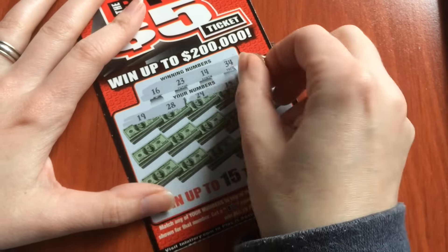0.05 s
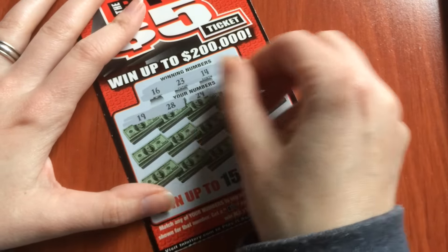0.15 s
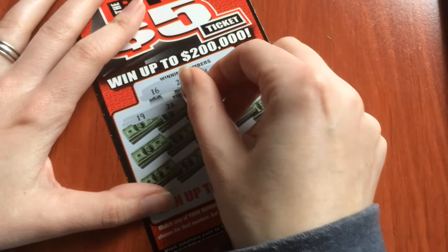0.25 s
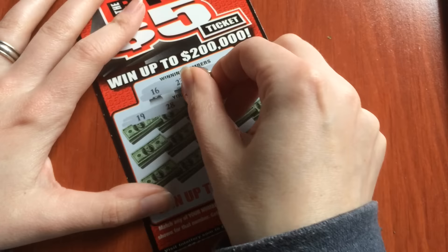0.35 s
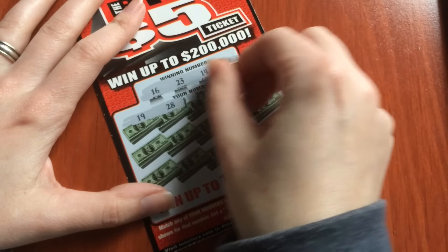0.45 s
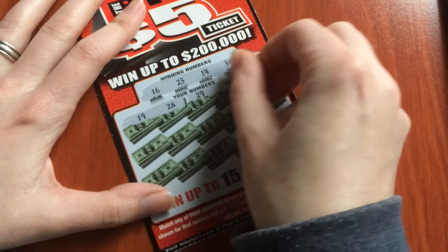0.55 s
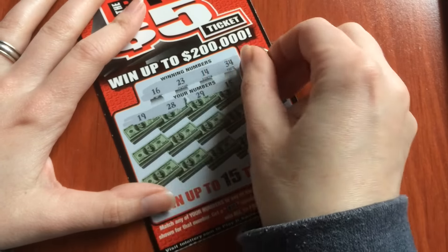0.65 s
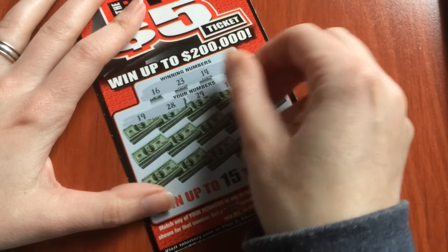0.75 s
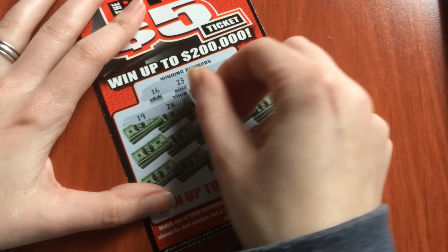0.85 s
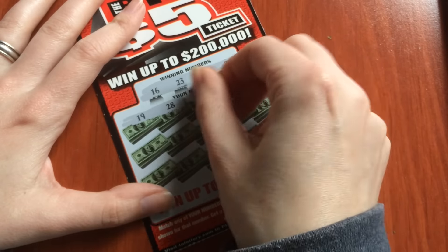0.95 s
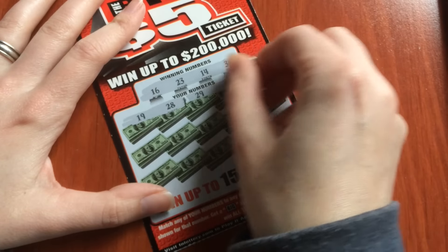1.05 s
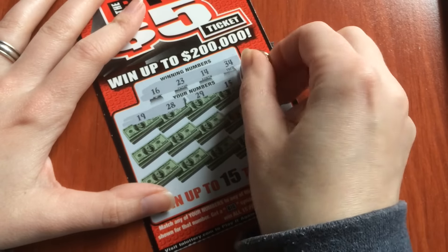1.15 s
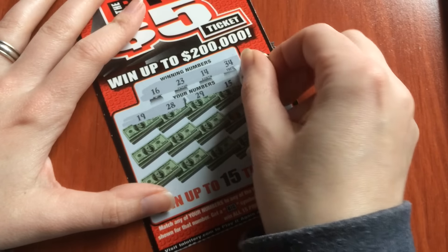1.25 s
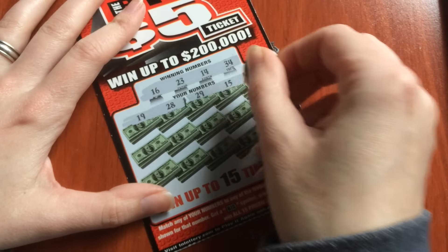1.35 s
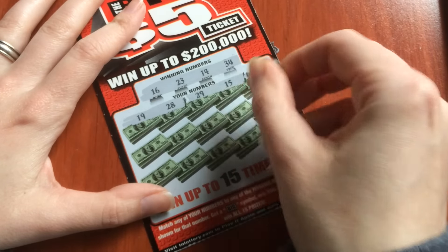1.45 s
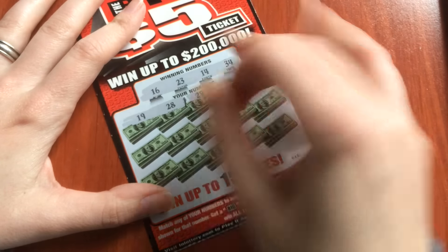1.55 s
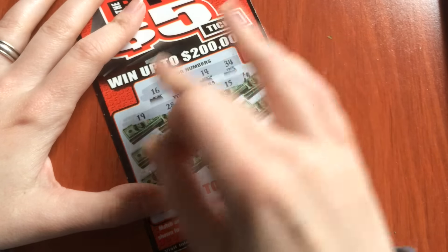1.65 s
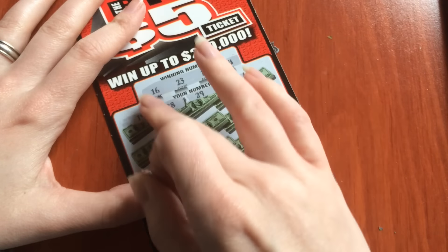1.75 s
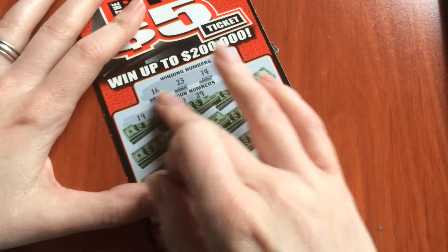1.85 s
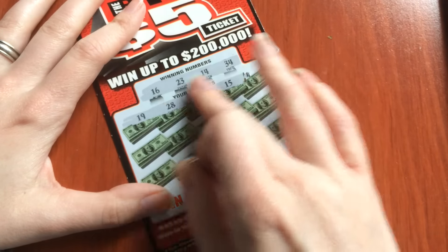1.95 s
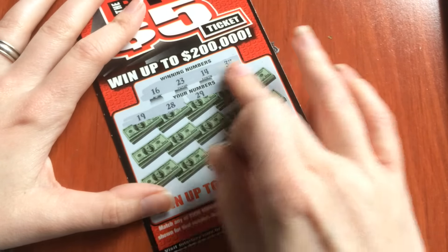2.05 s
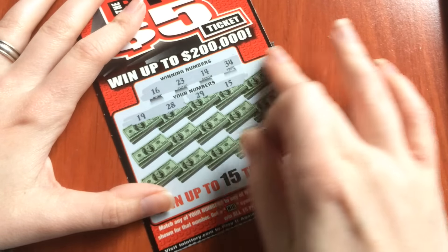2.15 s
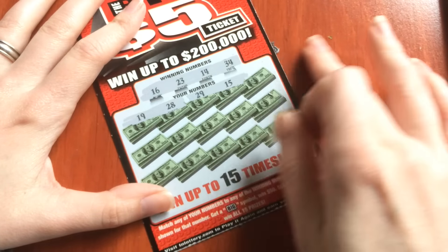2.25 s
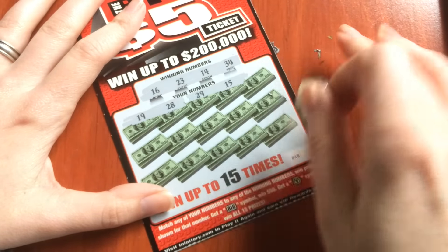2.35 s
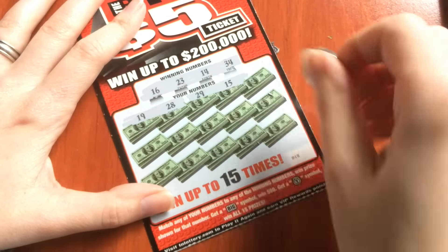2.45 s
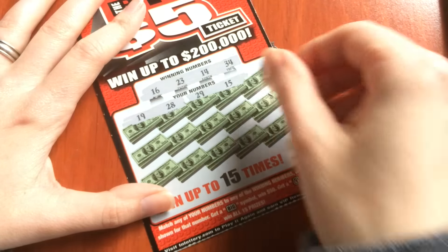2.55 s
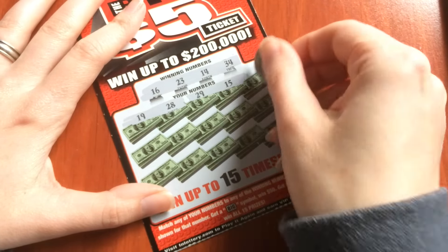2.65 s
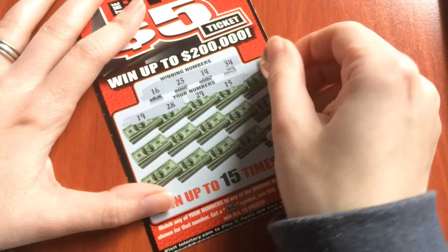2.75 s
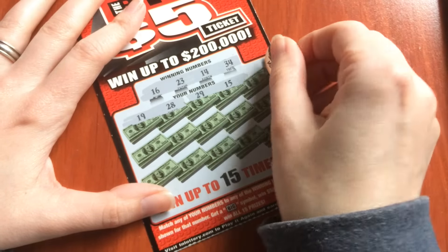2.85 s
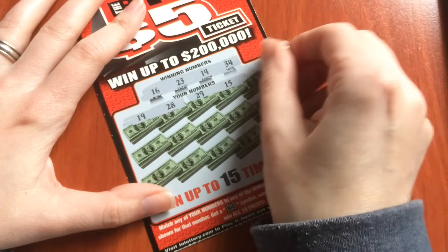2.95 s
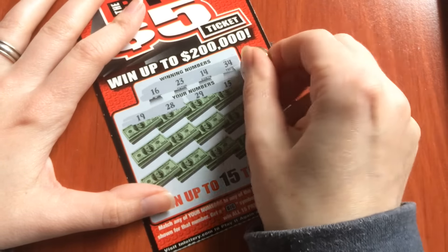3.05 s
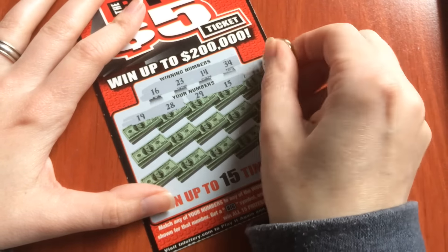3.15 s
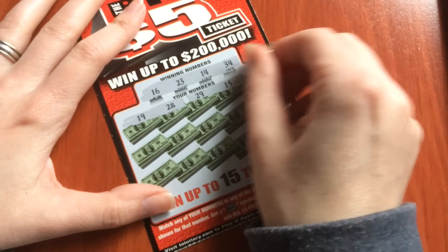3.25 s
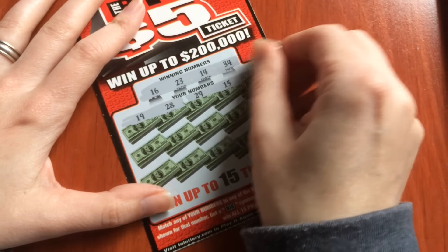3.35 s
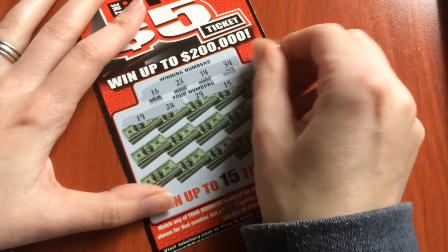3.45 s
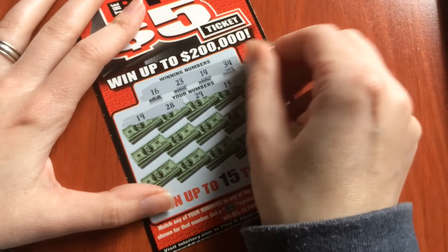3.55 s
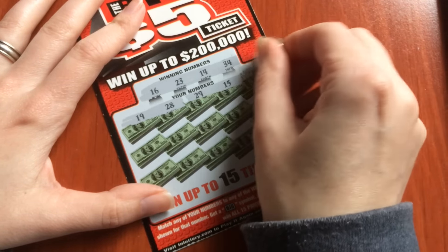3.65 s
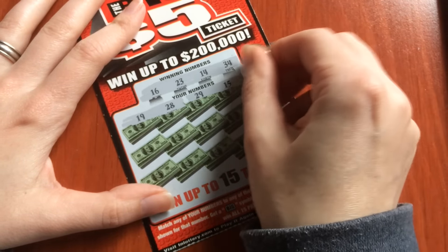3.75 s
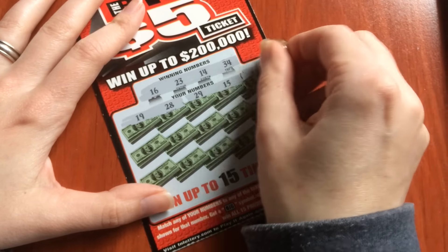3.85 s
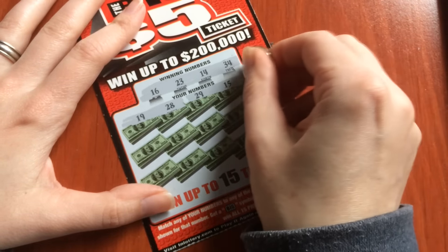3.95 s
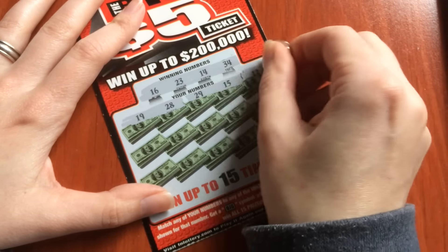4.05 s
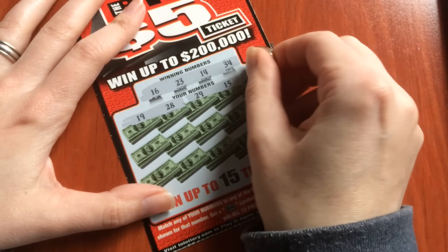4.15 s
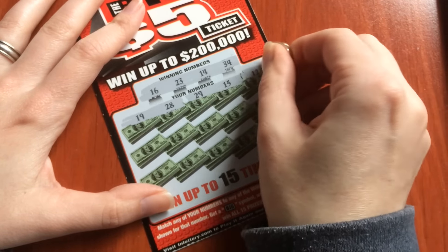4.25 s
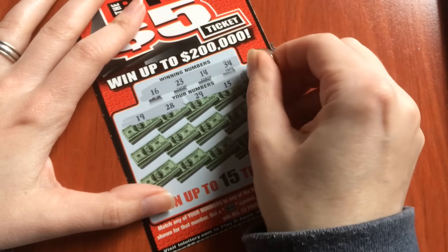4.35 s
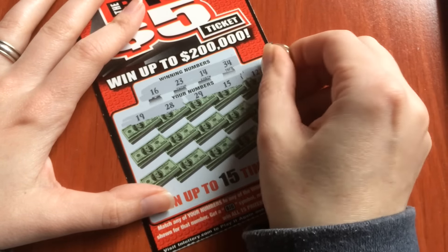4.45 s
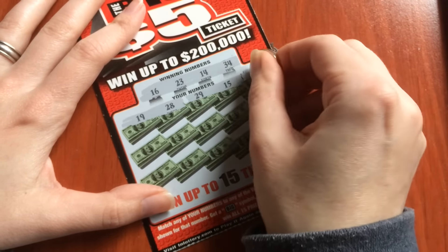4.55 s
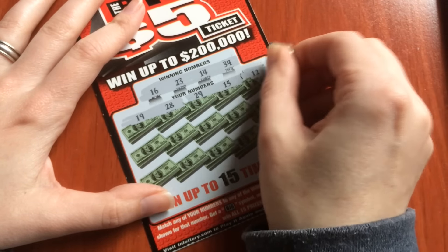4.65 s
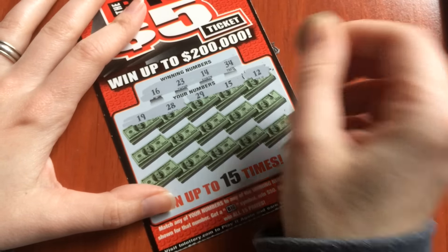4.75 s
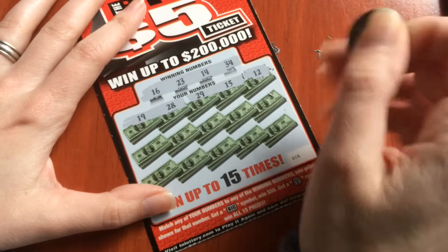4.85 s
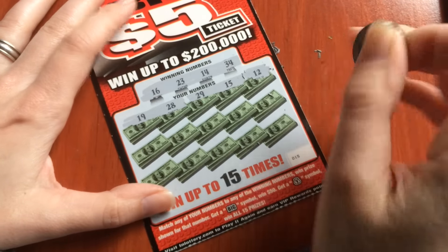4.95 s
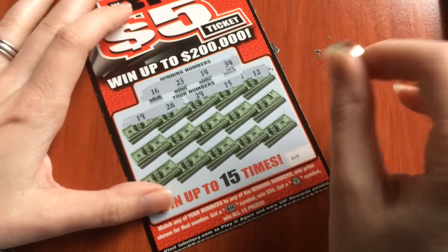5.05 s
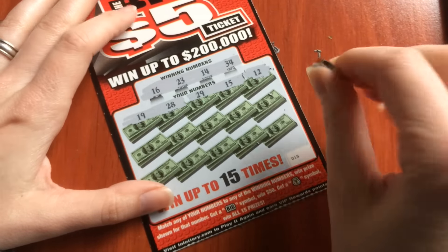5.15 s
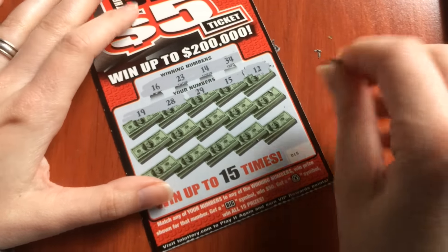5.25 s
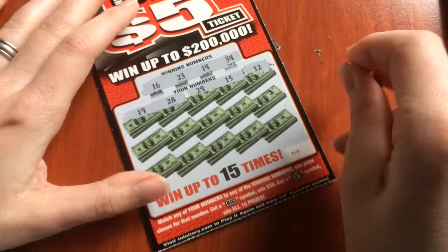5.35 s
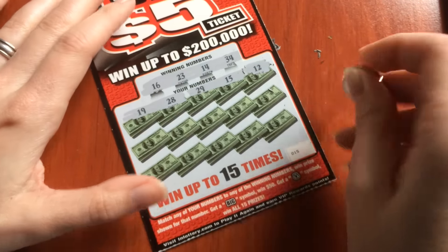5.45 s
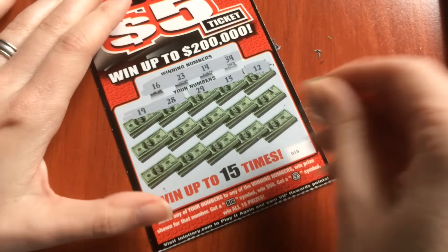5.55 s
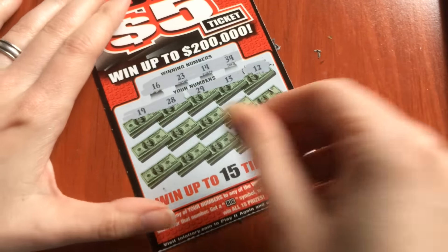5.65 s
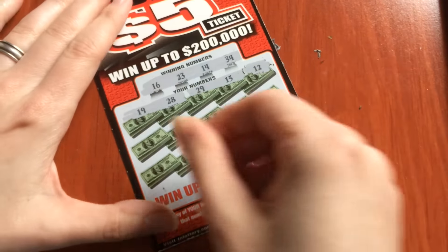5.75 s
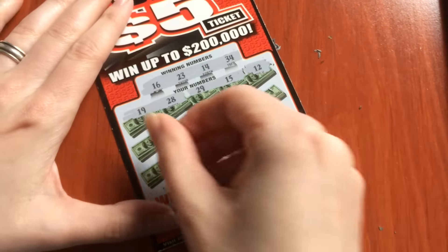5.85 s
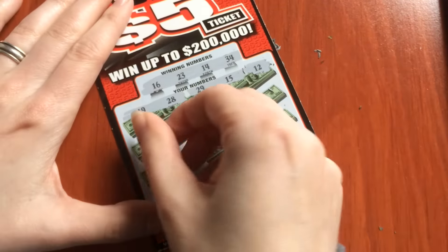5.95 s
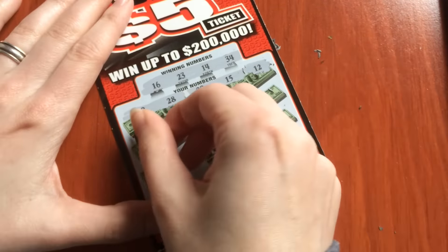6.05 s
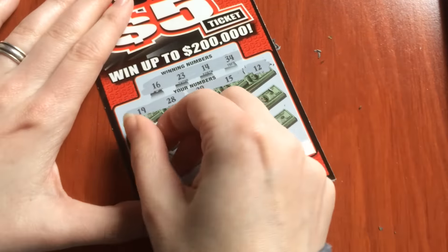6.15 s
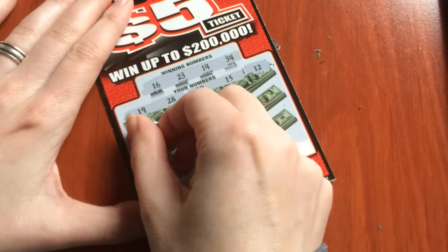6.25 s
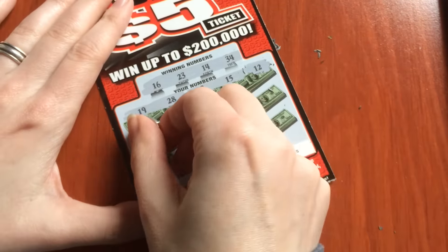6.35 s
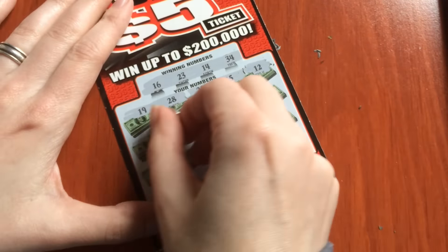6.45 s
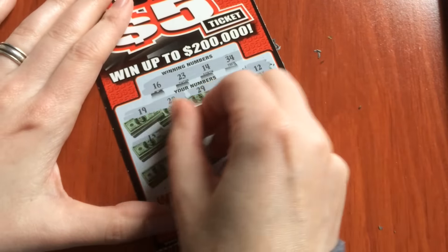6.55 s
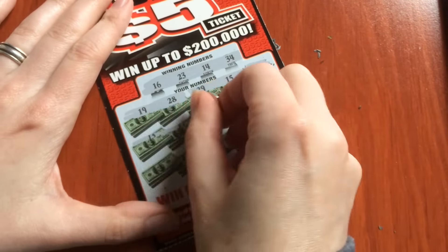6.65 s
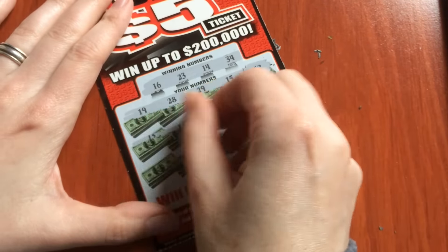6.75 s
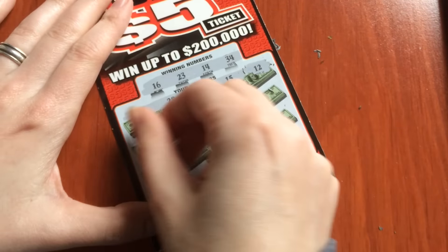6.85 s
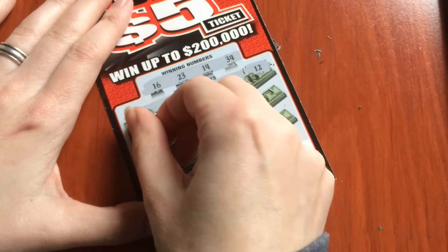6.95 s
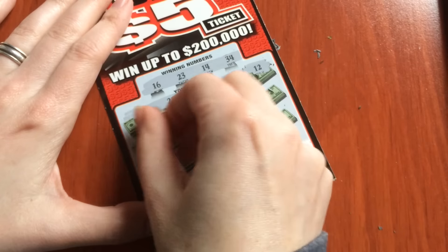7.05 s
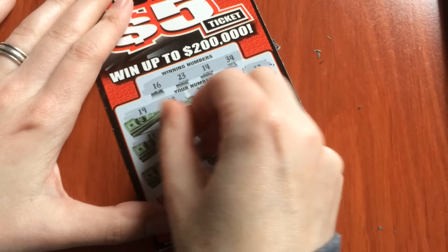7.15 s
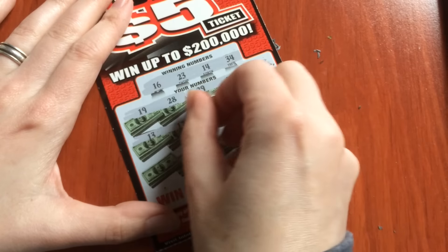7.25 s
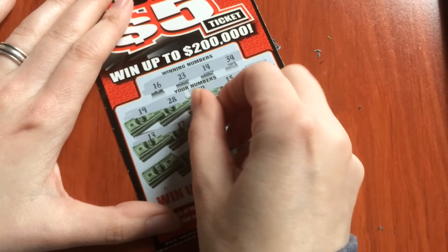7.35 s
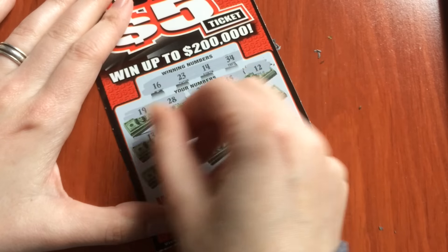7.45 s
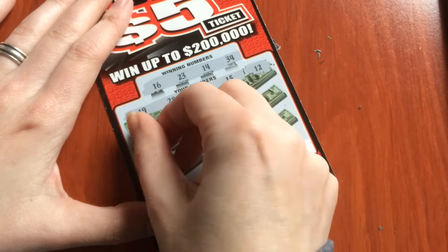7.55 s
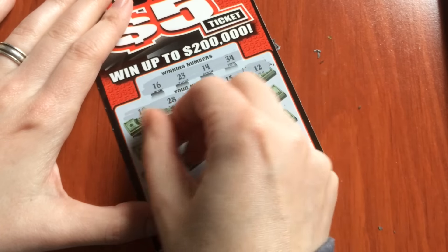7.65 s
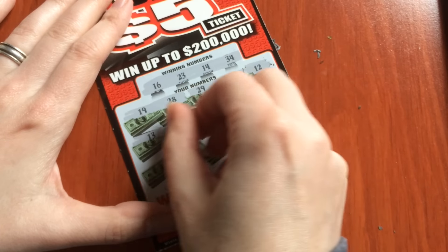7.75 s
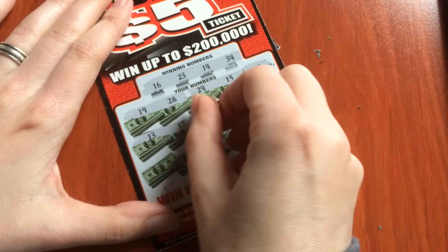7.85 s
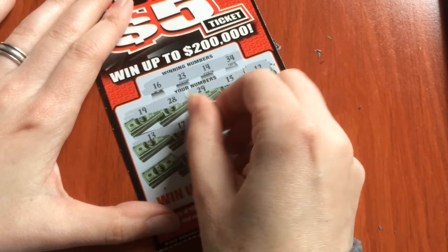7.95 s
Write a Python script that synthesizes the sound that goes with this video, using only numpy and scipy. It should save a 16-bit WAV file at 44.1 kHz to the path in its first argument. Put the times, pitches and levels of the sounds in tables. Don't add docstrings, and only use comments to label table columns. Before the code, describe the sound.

Very close to a phone microphone, a coin rasps across a coated paper ticket on a wooden table. Two short pulls, hard rim taps and a faint graze come first, then fingertip wipes, tiny nail ticks and a soft cuff rustle. A rapid, even back-and-forth scrub follows. After a lull with small ticks, knocks lead into several short, biting scrapes. Small quiet room, short echo, low rumble and faint hiss.

```python
import sys
import numpy as np
from scipy import signal
from scipy.fft import rfft, irfft, next_fast_len
from scipy.io import wavfile
from scipy.ndimage import uniform_filter1d

SR = 44100
rng = np.random.default_rng(int(sys.argv[2]) if len(sys.argv) > 2 else 0)


def to_wav(s):
    ch = np.atleast_2d(s).T
    pcm = np.round(np.clip(ch, -1, 1) * 32767)
    wavfile.write(sys.argv[1], SR, pcm.astype(np.int16))


def volts(x):
    e = np.asarray(x, float) / 20
    return 10 ** e


N = 353505

# start in seconds, length in seconds, rasp in dB,
# gain in speed from start to end in dB, bite in dB.
LONG_PULLS = [
    (-0.1, 0.28, -39, -3.5, 1),
    (0.487, 0.29, -41.5, -12.5, 0.5),
    (6.481, 0.15, -39.5, -6.5, 4),
    (6.572, 0.24, -40.5, 2.5, 5),
    (7.122, 0.33, -41, 1, 3.5),
    (7.72, 0.3, -40.5, 11.5, 0),
]
OPENING_PUSH = [
    (3.047, 0.14, -36.5, 1, 3.2),
]
# start in seconds, length in seconds, rasp in dB, bite in dB,
# share of the length at which the coin is fastest.
GRAZES = [
    (1.072, 0.26, -47, -9, 0.28),
]
PUSHES = [(3.31, 0.11, -37, 2.5, 0.51), (3.542, 0.099, -38, 3.5, 0.53), (3.764, 0.094, -37, -10, 0.48),
          (3.969, 0.094, -36.5, -8.5, 0.48), (4.182, 0.098, -38.5, -8, 0.28),
          (4.387, 0.093, -40.5, -1, 0.55), (4.595, 0.081, -40, -6, 0.51)]
RETURNS = [(3.186, 0.093, -37.5, 0.93, 0.46), (3.434, .11, -40, 0.59, 0.41), (3.658, .1, -44.5, -4, 0.4),
           (3.874, 0.091, -44, -3.2, 0.29), (4.077, 0.096, -37, 1, 0.41), (4.285, 0.097, -38, 0.43, 0.38),
           (4.498, 0.078, -34.5, -0.98, 0.48), (4.694, 0.091, -40, -1, 0.47)]

# lower edge in Hz, upper edge in Hz.
PART_EDGES_HZ = [(900, 2000), (300, 900), (2000, 5000), (5000, 15000), (100, 300)]
PER_SPEED = (1.01, 0.68, 1.62, 1.39, 0.45)
PER_BITE = (0.12, -0.1, 0.99, 0.8, -0.1)
PULL_PARTS_DB = (0.5, -11, -3.5, -20.5, -22.5)
PUSH_PARTS_DB = (-1, -5.5, -13.5, -24, -20)
RETURN_PARTS_DB = (0, -12.5, -11.5, -24.5, -30)
# frequency in Hz, width in Hz, peak in dB.
PULL_BOARD = ([
    [(88, -43), (150, -8), (197, -7), (420, -18), (453, -10.5), (877, -12.5), (1320, -3), (1420, 0.5), (2020, -10), (2810, -9), (5990, -30.5), (8330, -32.5), (15500, -36.5)],
    [(465.3, 17, -0.5), (605, 32, -5), (1448, 32, 2), (2394, 51, -13), (2680, 58, -12), (3040, 32, -15.5), (3590, 35, -21.5), (4420, 81, -18), (4600, 79, -30), (5520, 65, -22), (6120, 200, -37), (7660, 60, -25), (8330, 210, -26)],
])
PUSH_BOARD = ([
    [(88, -40), (150, -16.5), (268, -18), (595, -2), (812, -9), (1090, 1.5), (2230, -18.5), (4310, -32), (6730, -42.5), (11400, -39), (15500, -44)],
    [(456, 24, 3), (605, 13, 3.5), (11300, 510, -27), (1060, 54, 3), (1245, 68, 2), (1407, 60, 4.5), (1740, 33, -10), (2000, 32, -22), (2560, 13, -40), (2975, 44, -6), (3750, 220, -11.5), (4350, 120, -15), (5880, 97, -25.5)],
])
# frequency in Hz, width in Hz, peak in dB.
RETURN_PEAKS = [(451, 10, -3), (706, 73, -11), (1680, 130, -21), (11200, 710, -25), (1090, 54, 7.5),
                (1247, 90, 7.5), (1439, 39, 7.5), (1570, 58, 1.5), (2433, 98, -2), (3220, 46, -19),
                (3840, 50, -6), (4260, 76, -17), (5500, 90, -16)]

# start in seconds, peak in dB, push length in ms,
# rattle in dB, rattle t60 in seconds.
KNOCKS = [(0.219, -51.5, 0.67, -4.5, 0.17), (0.344, -55.5, 0.53, -1, 0.27), (0.803, -54.5, 1, -18, 0.087),
          (2.905, -52.5, 0.69, 1, 0.11), (6.236, -45, 1.1, -3, 0.21), (6.846, -54, 0.7, 9, 0.091),
          (6.991, -54, 1.1, -14, 0.12), (7.041, -38, 1.12, -6, 0.06), (7.636, -47, 1.2, -5, 0.34)]
LOUD_KNOCKS = [
    (0.374, -28.5, 0.62, 1, 0.068),
    (0.988, -30.5, 0.46, 3, 0.071),
]
# frequency in Hz, level in dB, t60 in seconds.
TABLE_MODES = [(460, -4, 0.13), (602, -2.5, 0.047), (730, -0.5, 0.044), (1033, -44, 0.035),
               (1065, -9, 0.084), (1138, -14, 0.06), (1390, -3, 0.031), (1520, -10, 0.072),
               (1580, 4.5, 0.0094), (1800, -23, 0.066), (2046, -40, 0.12)]
# start in seconds, peak in dB, pitch in Hz, t60 in ms.
TICKS = [(1.726, -56, 2300, 3.2), (1.8799, -44.5, 6600, 4.6), (2.0023, -46, 12800, 4.0),
         (2.005, -48, 3500, 8.9), (2.027, -42.5, 3330, 10), (2.05, -46, 3520, 12), (2.167, -32.5, 12300, 5),
         (2.1787, -42, 12000, 4.0), (2.177, -41, 1780, 12), (5.011, -57, 8000, 13),
         (2.7227, -50, 6000, 3.8), (2.873, -54, 4750, 3.7), (5.021, -39.5, 7850, 3.2),
         (5.149, -47.5, 2440, 4), (5.212, -55, 4260, 4.3), (5.4338, -44.5, 3970, 5.7),
         (6.222, -39, 5400, 4.7), (7.038, -37.5, 6700, 5.4), (7.6269, -43, 10700, 4.1)]
# start in seconds, length in seconds, fine hiss in dB,
# body relative to it in dB, share of the length at which the hand is fastest.
WIPES = [(1.56, .09, -74, -8, .5), (1.904, 0.12, -69, -11, 0.4), (1.994, 0.33, -56, -4.5, 0.13),
         (2.157, 0.23, -52, -7, 0.13), (2.498, .12, -73, -8, .5), (2.868, 0.068, -67.5, -3, .15),
         (4.866, 0.13, -64.5, -9, 0.43), (5.692, 0.11, -70, -13, 0.47), (6.0, .1, -74, -12, .4)]
# start in seconds, length in seconds, level in dB,
# share of the length at which it is fastest.
CUFF_DRAGS = [
    (1.9, 1.19, -69.5, 0.59),
]
# frequency in Hz, level in dB per Hz.
ROOM_SPECTRUM = [(12, -47), (20, -15), (64, -2), (140, -5), (185, -9.5), (225, -4.5), (324, -15),
                 (393, -16), (705, -23.5), (767, -24), (1340, -27), (1770, -28), (2470, -31),
                 (15500, -36.5)]

GRAINS_PER_S, GRAIN_DB, CHATTER_DB = 12000, 0.47, 0.23
SPOT_S, RING_DB, PLACE_DB = 0.03, 2, 0.5
LEAD = 200
LAND_S, LIFT_S, LIFT_DB, ARCH_DB = 0.013, 0.075, -28, 4
LAND_PER_GAIN_S = 0.0023
SCRAPE_POWER, WIPE_POWER, CUFF_POWER = 1.66, 1.86, 0.52
BODY_PER_SPEED = 1.57
ECHO_DB, ECHO_T60_S = -12, 0.087
ROOM_DB, SWAY_DB, HUM_DB = -64, 3.5, 1
TOP_HZ = 15430


def unit(x):
    return x / np.sqrt(np.mean(x ** 2))


def band(x, lo_hz, hi_hz, order=3):
    edges = [lo_hz, min(hi_hz, 0.45 * SR)]
    return signal.sosfilt(signal.butter(order, edges, "band", fs=SR, output="sos"), x)


def shape(points, hz):
    f, db = np.transpose(points)
    return volts(np.interp(np.log(np.maximum(hz, 1)), np.log(f), db))


def colour(x, points):
    size = next_fast_len(len(x))
    hz = np.arange(size // 2 + 1) * SR / size
    return irfft(rfft(x, size) * shape(points, hz), size)[:len(x)]


def walk(rate, size):
    hold = int(SR / rate)
    levels = np.repeat(rng.standard_normal(400)[:size // hold + 1], hold)
    return unit(uniform_filter1d(levels, hold)[:size])


def decay(size, t60):
    return np.exp(-np.log(1000) * np.arange(size) / (t60 * SR))


def ring(hz, db, t60, size):
    t = np.arange(size)[:, None] / SR
    return (volts(db) * np.exp(-np.log(1000) * t / t60) * np.sin(2 * np.pi * hz * t)).sum(axis=1)


def add(out, s, x):
    i = int(s * SR)
    x, i = x[max(-i, 0):], max(i, 0)
    out[i:i + len(x)] += x[:len(out) - i]


def stroke(parts_db, slope, peaks):
    size = SR // 2
    strength = volts(GRAIN_DB * np.minimum(rng.exponential(size=size), 3))
    slips = (rng.random(size) < GRAINS_PER_S / SR) * strength
    chatter = volts(CHATTER_DB * (walk(64, size) + walk(242, size)))
    force = unit(slips * rng.standard_normal(size)) * chatter
    force = force[:len(parts_db[0])]
    place = np.arange(len(force)) / (SPOT_S * SR)
    out = 0
    for k, spot in enumerate(boards(slope, peaks, count=int(place[-1]) + 2)):
        here = np.cos(np.pi / 2 * np.clip(place - k, -1, 1))
        for (lo, hi), db in zip(PART_EDGES_HZ, parts_db):
            h = band(spot, lo, hi)
            out = out + signal.fftconvolve(here * force * volts(db), h / np.sqrt(np.sum(h ** 2)))
    return out[LEAD:]


def boards(slope, peaks, count):
    hz, width, db = np.transpose(peaks)
    t60 = np.log(1000) / (np.pi * np.clip(width, 0.029 * hz, 600))
    lift_db = db - 20 * np.log10(shape(slope, hz))
    lift_db += RING_DB - np.median(lift_db)
    start = 2 * np.log(1000) / (t60 * SR)
    modes = np.array([a * ring(f, g, d, size=4000) for a, f, g, d in zip(start, hz, lift_db, t60)])
    for _ in range(count):
        strength = volts(PLACE_DB * rng.standard_normal(len(hz)))
        h = (rng.choice([-1, 1], len(hz)) * strength) @ modes
        h[0] += 1
        smear = rng.standard_normal(1200) * np.exp(-np.arange(1200) / (0.0092 * SR))
        h = h + 0.036 * signal.fftconvolve(h, smear)[:len(h)]
        yield colour(np.roll(h, LEAD), slope)


def parts(db, speed_db, bite_db, share_db):
    return [db + share + a * speed_db + b * bite_db
            for share, a, b in zip(share_db, PER_SPEED, PER_BITE)]


def drag(length, gain_db):
    t = np.arange(int(length * SR)) / SR
    landing = np.clip(1 - t / (LAND_S + LAND_PER_GAIN_S * max(gain_db, 0)), 0, 1)
    lift = np.clip(1 - (length - t) / LIFT_S, 0, 1) ** 1.56
    arch = ARCH_DB * (np.sin(np.pi * t / length) - 1)
    return LIFT_DB * (landing + lift) + gain_db * (t / length - 0.5) + arch


def swing(length, fastest, power):
    way = np.arange(1, int(length * SR)) / (length * SR)
    bend = np.log(0.5) / np.log(fastest)
    return np.maximum(20 * power * np.log10(np.sin(np.pi * way ** bend) + 1e-9), -60)


def knock(db, push_ms, rattle_db, rattle_t60):
    hz, mode_db, t60 = np.transpose(TABLE_MODES)
    detune, uneven = rng.standard_normal((2, len(hz)))
    h = ring(hz * (1 + 0.02 * detune), mode_db + 2 * uneven, t60, size=6000)
    rattle = unit(band(rng.standard_normal(6000), 210, 1500)) * decay(6000, rattle_t60)
    push = np.hanning(int(push_ms * SR / 1000) + 3)
    x = band(np.convolve(h + volts(rattle_db) * rattle, push), 272, 1600)
    x = x / np.abs(x).max()
    add(x, 0, tick(-18, 2250, 15))
    return x * volts(db)


def tick(db, hz, t60_ms):
    crack = rng.standard_normal(600) * decay(600, t60_ms / 1000)
    pitched = band(crack, 0.81 * hz, 1.41 * hz, order=2)
    snap = band(crack, 2200, 14600, order=1)
    x = pitched + volts(-4) * snap
    return x * volts(db) / np.abs(x).max()


def wipe(length, db, body_db, fastest):
    fine_db = swing(length, fastest, WIPE_POWER)
    patches = volts(1.3 * walk(70, SR // 2))
    rub = (rng.standard_normal(SR // 2) * patches)[:len(fine_db)]
    fine = unit(band(rub, 7600, 20000, order=2))
    body = unit(band(rub, 2000, 11000, order=2))
    return volts(db + fine_db) * fine + volts(db + body_db + BODY_PER_SPEED * fine_db) * body


def cuff(length, db, fastest):
    speed_db = swing(length, fastest, CUFF_POWER)
    rub = unit(band(rng.standard_normal(2 * SR), 120, 360, order=2)) * volts(3.2 * walk(14.06, 2 * SR))
    return rub[:len(speed_db)] * volts(db + speed_db)


def echo(table):
    walls = band(rng.standard_normal(SR // 2), 450, 6800, order=1) * decay(SR // 2, ECHO_T60_S)
    walls = walls / np.sqrt(np.sum(walls ** 2))
    return volts(ECHO_DB) * signal.fftconvolve(table, walls)[:N]


def room():
    air = unit(band(colour(rng.standard_normal(N), ROOM_SPECTRUM), 17, 17000, order=2))
    out = air
    for lo, hi, db, rate in [(20, 84, SWAY_DB, 5.3), (97, 480, HUM_DB, 4.2)]:
        out = out + band(air, lo, hi, order=1) * (volts(db * walk(rate, N)) - 1)
    return volts(ROOM_DB) * out


def scene():
    table = np.zeros(N)
    for rows, share_db, board in [(LONG_PULLS, PULL_PARTS_DB, PULL_BOARD),
                                  (OPENING_PUSH, PUSH_PARTS_DB, PUSH_BOARD)]:
        for s, length, db, gain_db, bite_db in rows:
            add(table, s, stroke(parts(db, drag(length, gain_db), bite_db, share_db), *board))
    for rows, share_db, board in [(GRAZES, PULL_PARTS_DB, PULL_BOARD),
                                  (RETURNS, RETURN_PARTS_DB, (PULL_BOARD[0], RETURN_PEAKS)),
                                  (PUSHES, PUSH_PARTS_DB, PUSH_BOARD)]:
        for s, length, db, bite_db, fastest in rows:
            speed_db = swing(length, fastest, SCRAPE_POWER)
            add(table, s, stroke(parts(db, speed_db, bite_db, share_db), *board))
    for source, rows in [(knock, KNOCKS), (knock, LOUD_KNOCKS), (tick, TICKS), (wipe, WIPES), (cuff, CUFF_DRAGS)]:
        for s, *settings in rows:
            add(table, s, source(*settings))
    return (table + echo(table) + room())[None]


def top_cut(x):
    return signal.sosfilt(signal.butter(12, 15850, fs=SR, output="sos"), x)


def record(dry):
    mix = signal.sosfilt(signal.ellip(10, 0.2, 70, TOP_HZ, fs=SR, output="sos"), dry)
    return top_cut(mix)


dry = scene()
out = record(dry)
to_wav(out)
```